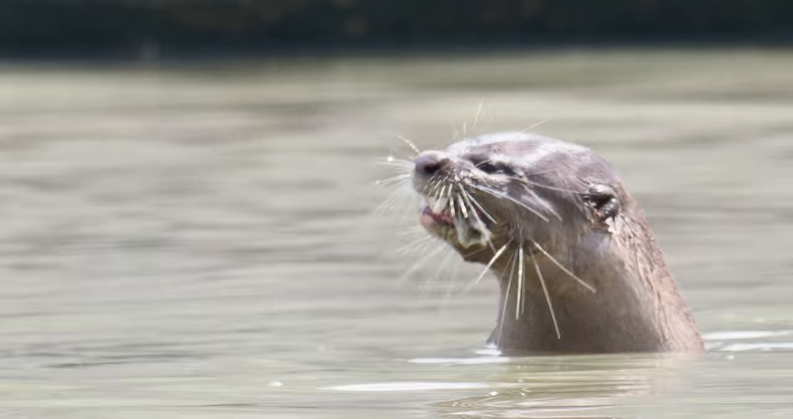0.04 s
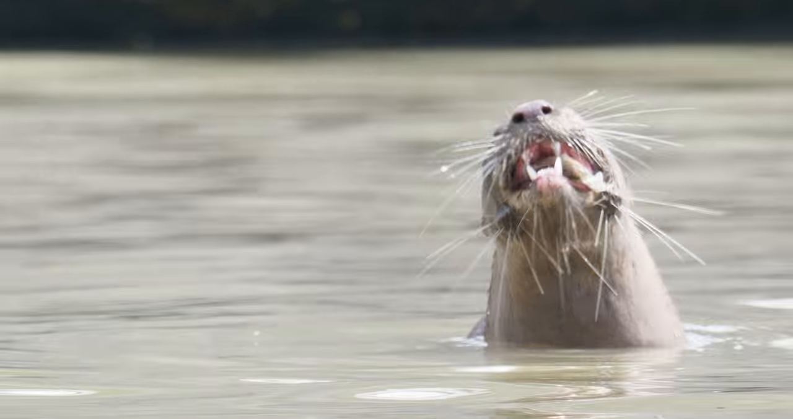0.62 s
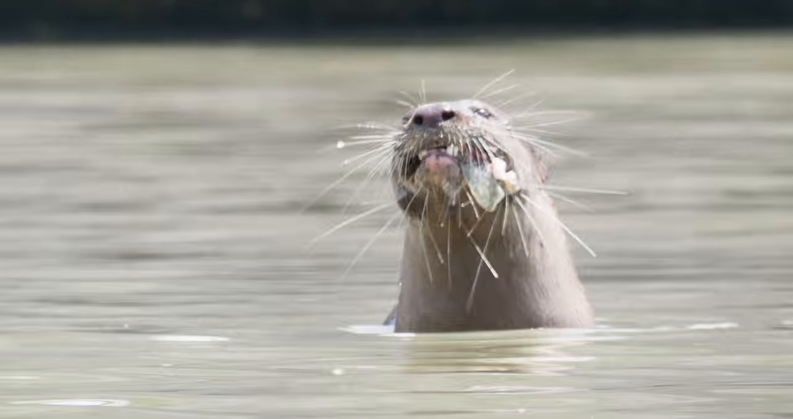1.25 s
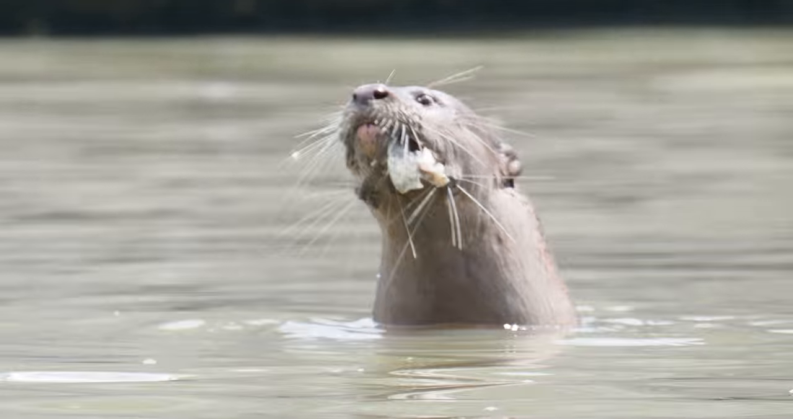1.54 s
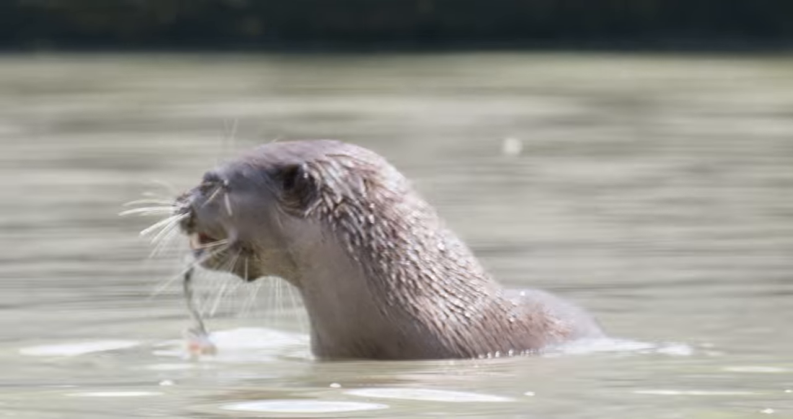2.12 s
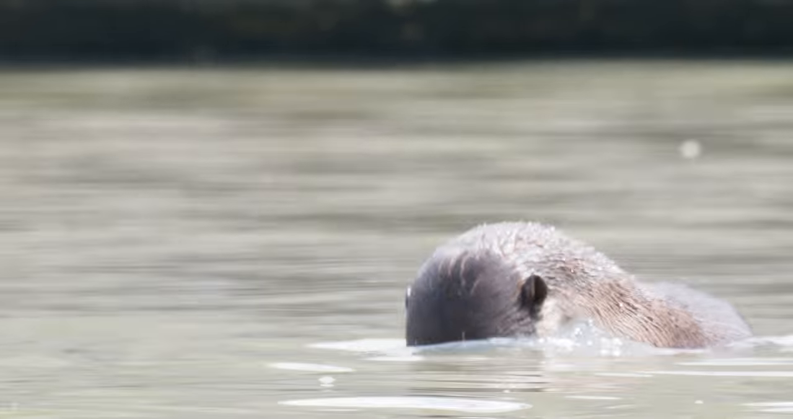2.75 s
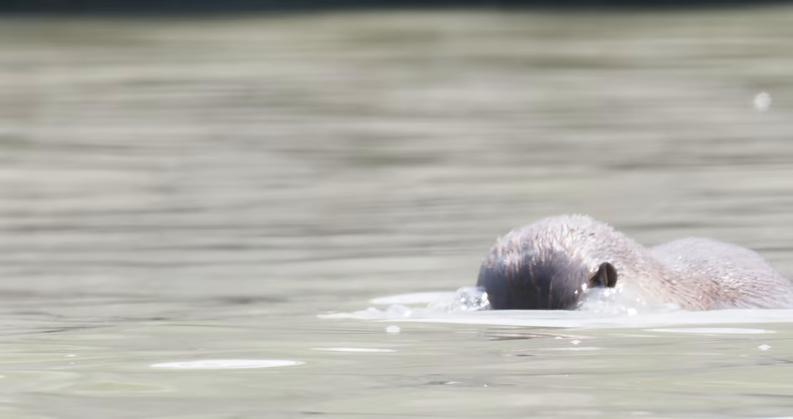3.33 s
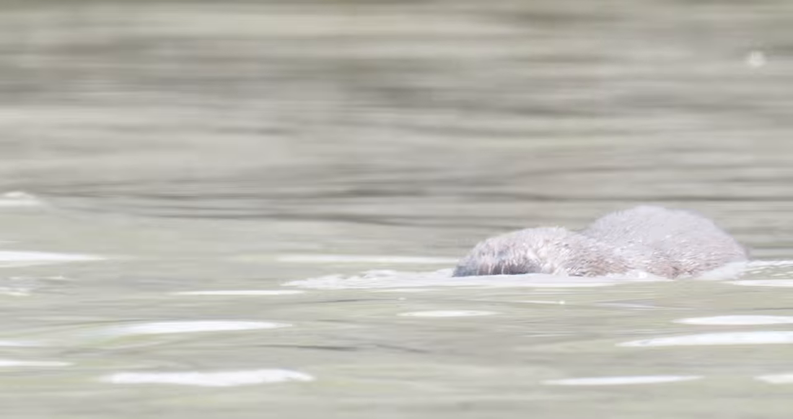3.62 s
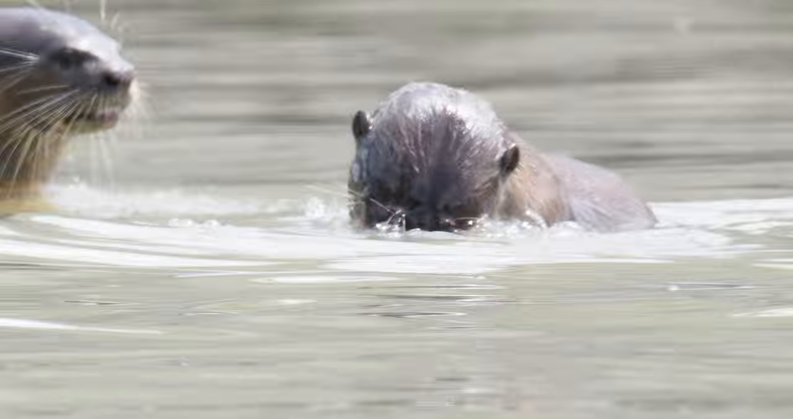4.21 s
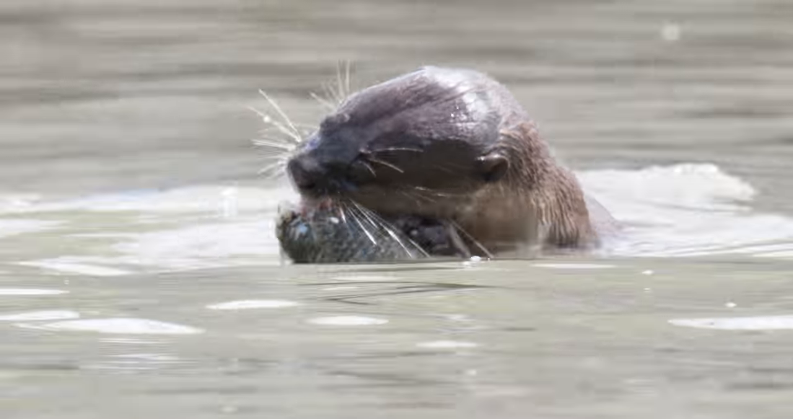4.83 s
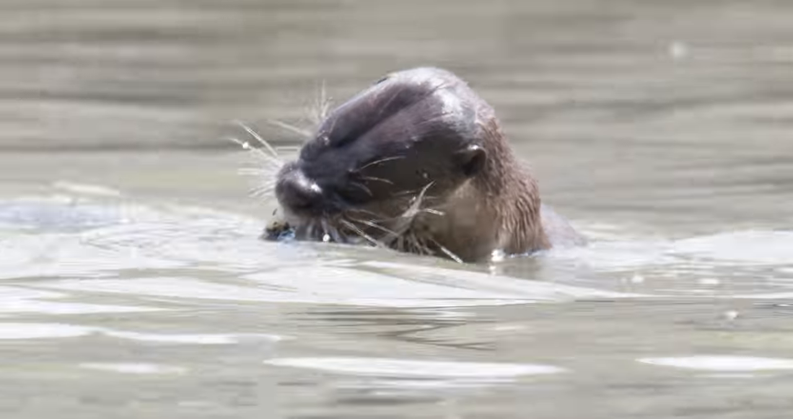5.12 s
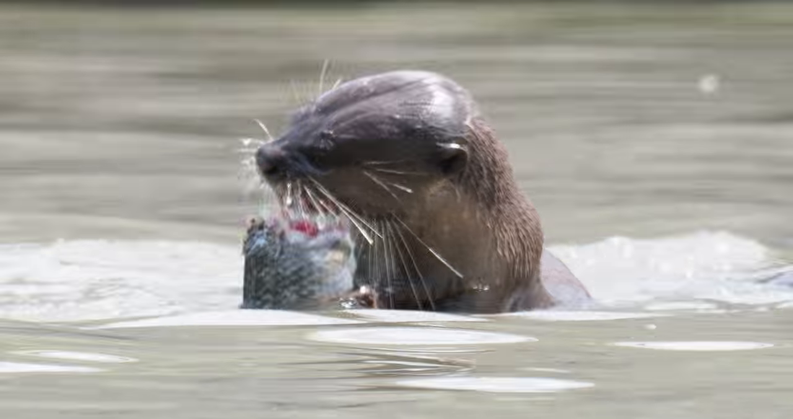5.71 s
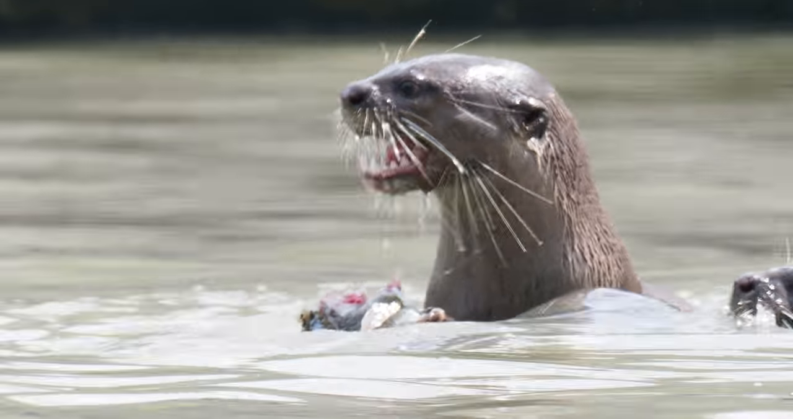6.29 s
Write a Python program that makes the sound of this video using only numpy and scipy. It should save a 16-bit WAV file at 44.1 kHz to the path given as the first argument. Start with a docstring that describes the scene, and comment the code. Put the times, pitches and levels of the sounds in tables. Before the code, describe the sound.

Two clusters of shrill otter squeaks by a river, with a low rumble and hiss of far traffic and breeze between them.

```python
"""Otters squeak in two bouts, their tight vocal folds giving nearly pure tones that the river's
ripples scatter and its bank reflects. One chews a fish in gritty snaps, and wavelets fizz faintly.
Far traffic roars and hisses as broadband noise, and one distant engine hums and sags in pitch.
The turbulence of a breeze buffets the microphone, mostly its left side."""
import sys
import numpy as np
from scipy import signal
from scipy.fft import rfft, irfft
from scipy.io import wavfile

SR = 44100
rng = np.random.default_rng(int(sys.argv[2]) if len(sys.argv) > 2 else 0)


def persist_wave(psi):
    """Save psi, clipped to +-1, as 16-bit WAV."""
    counts = np.round(np.clip(psi, -1, 1) * 32767).astype(np.int16)
    wavfile.write(sys.argv[1], SR, np.atleast_2d(counts).T)


N = 288855
T = np.arange(N) / SR
HZ = np.fft.rfftfreq(N, 1 / SR)

# Spectrum of crunches and wavelets. Each row: frequency in Hz, relative density in dB.
FIZZ_SPECTRUM = [(1500, -20), (3500, 6), (7000, 10.5), (11000, -2), (15500, 6)]


def gain_of(db):
    """Amplitude grows tenfold with every 20 dB."""
    return 10 ** (np.asarray(db) / 20)


def sides(db):
    """A level difference, left minus right, places a sound between the ears."""
    return gain_of(np.vstack([db, -db]) / 2)


def over_frequency(points):
    """Interpolation on a logarithmic frequency axis."""
    hz, value = np.transpose(points)
    return np.interp(np.log(HZ + 1), np.log(hz + 1), value)


def over_time(rows):
    """Linear interpolation in time, one curve for each column after the first."""
    times, *columns = np.transpose(rows)
    return [np.interp(T, times, column) for column in columns]


def step(at_s, over_s):
    """A smooth transition from 0 to 1."""
    return (1 + np.tanh((T - at_s) / over_s)) / 2


def bump(at_s, half_s):
    """A Gaussian swell from 0 to 1 and back."""
    return np.exp(-((T - at_s) / half_s) ** 2)


def wander(rate_hz):
    """Low-passed noise: a random fluctuation of rms 1, up to about the given rate."""
    drift = irfft(rfft(rng.standard_normal(N)) * np.exp(-(HZ / rate_hz) ** 2), N)
    return drift / np.sqrt(np.mean(drift ** 2) + 1e-20)


def noise(colour_db, correlation, balance_db=0., lag_s=.00007):
    """Partly coherent stereo noise whose channel average has rms 1; the right side lags slightly."""
    left, unrelated = rfft(rng.standard_normal((2, N)))
    shared = np.clip(correlation, -1, 1)
    right = (shared * left + np.sqrt(1 - shared ** 2) * unrelated) * np.exp(-2j * np.pi * HZ * lag_s)
    pair = irfft(np.array([left, right]) * gain_of(colour_db) * sides(balance_db), N)
    return pair / np.std(pair.mean(0))


def delayed(x, seconds):
    """Travel time shifts the phase in proportion to frequency."""
    return irfft(rfft(x) * np.exp(-2j * np.pi * HZ * seconds), N)


def scatter(x, t60, density=0.1):
    """Diffuse reflection: sparse echoes of random sign decay exponentially, different at each ear."""
    t = np.arange(SR // 2) / SR
    taps = rng.standard_normal((2, len(t))) * (rng.random((2, len(t))) < density) * 1000 ** (-t / t60)
    taps /= np.linalg.norm(taps, axis=1, keepdims=True)
    return signal.fftconvolve(x[None], taps, axes=1)[:, :N]


def traffic(roar_db=-41, hiss_db=-52, drone_db=-36.5, whine_hz=997, whine_width_hz=28, whine_db=5):
    """Far tyres sum incoherently to a roar with a faint tread whine and a hiss, over the town's drone."""
    # Three spectra. Each row: frequency in Hz, relative density in dB.
    roar_spectrum = [(200, -22), (340, -12.5), (389, -8.5), (519, -10.5), (597, -7), (719, -5.5), (853, -7),
                     (1000, -2), (1060, 0), (1240, -3.5), (1510, -6.5), (1840, -16.5), (2000, -20.5),
                     (2600, -54), (4400, -120)]
    hiss_spectrum = [(1120, -13.5), (1900, -13), (2090, -2.5), (2580, 2), (2820, -1), (3250, -2),
                     (4080, -12), (5310, -14), (6440, -22.5), (7880, -22.5), (9900, -17.5), (11400, -30),
                     (15500, -37)]
    drone_spectrum = [(20, -9), (45, -2), (70, 1.5), (110, -3.5), (170, -6.5), (250, -10), (330, -12.5),
                      (450, -41.5), (900, -81)]
    # The traffic eases slowly. Each row: time in seconds, relative levels of roar and hiss in dB.
    trend = [(0.2, -41.5, -50.5), (1.0, -41, -48.5), (1.42, -41, -49), (1.7, -40.5, -49),
             (4.0, -42.5, -51.5), (6.55, -42.5, -51.5)]
    # Likeness of the two sides. Each row: frequency in Hz, correlation (capped at 1 in use).
    likeness = [(60, 1.5), (290, 0.87), (640, 0.85), (1100, 0.7), (1500, .5), (2200, -0.6), (3100, 0),
                (7000, 0)]
    # Lean to the left. Each row: frequency in Hz, left minus right in dB.
    balance = [(100, 0.52), (400, 1.8), (1290, 2.1), (2400, 4.6), (4400, 3.6), (8100, 1.7), (15000, 6)]
    roar_trend_db, hiss_trend_db = (db - np.median(db) for db in over_time(trend))
    stereo = over_frequency(likeness), over_frequency(balance)
    whine = whine_db * np.exp(-((HZ - whine_hz) / whine_width_hz) ** 2)
    roar = noise(over_frequency(roar_spectrum) + whine, *stereo) * gain_of(roar_db + roar_trend_db)
    hiss = noise(over_frequency(hiss_spectrum), *stereo) * gain_of(hiss_db + hiss_trend_db)
    drone = noise(over_frequency(drone_spectrum), *stereo) * gain_of(drone_db + roar_trend_db)
    flicker = gain_of(0.5 * wander(41))
    return (roar + hiss) * flicker + drone


def engine(fast_hz=150.4, slow_hz=141.53, waver=0.0057, fading_db=2.5):
    """Pitch follows speed: a slowing engine's hum and octave sag, and fade in and out over the water."""
    # Strength of the hum. Each row: time in seconds, base levels of fundamental and octave in dB.
    levels = [(0.2, -43, -43), (0.68, -60, -49), (1.2, -40, -40.5), (1.5, -42.5, -43), (1.9, -34.5, -40),
              (2.15, -46.5, -47.5), (2.4, -43.5, -45), (4.1, -49, -48), (4.8, -44, -49), (5.5, -61, -54),
              (6.55, -51, -47.5)]
    # At moments the air carries the octave better. Each row: time in seconds, lift in dB.
    lifts = [(3.7, 8), (4.43, 9.5), (5.17, 10.5)]
    hz = fast_hz + (slow_hz - fast_hz) * step(at_s=1.5, over_s=1.055)
    fundamental_db, octave_db = over_time(levels)
    octave_db += sum(lift_db * bump(at_s, half_s=0.13) for at_s, lift_db in lifts)
    phase = 2 * np.pi * np.cumsum(hz * (1 + waver * wander(22.6))) / SR
    fundamental = gain_of(fundamental_db + fading_db * wander(15)) * np.sin(phase)
    octave = gain_of(octave_db + fading_db * wander(15)) * np.sin(2 * phase)
    return sides(2.1) * np.sqrt(2) * (fundamental + octave)


def wind(breeze_db=-35.5, easing_db_per_s=0.5, lumpy_db=0.7):
    """Turbulent pressure is local, so the microphone's two ports are buffeted almost independently."""
    # Spectrum of the turbulence. Each row: frequency in Hz, relative density in dB.
    spectrum = [(8, -22), (20, -3), (38, 4.5), (70, -2), (110, -12), (180, -17.5), (300, -29), (600, -58),
                (1500, -88)]
    # Gusts add to the breeze in power. Each row: time in seconds, peak in dB, half length in seconds.
    gusts = [(0.224, -31, 0.14), (.55, -31, 0.12), (1.23, -27.5, 0.052), (1.698, -28.5, 0.028),
             (2.266, -29.5, 0.13), (2.6, -29, .04), (2.845, -32, 0.048), (3.29, -32, 0.116),
             (3.88, -26, 0.067), (4.655, -33.5, 0.05), (5.063, -31, 0.13), (5.54, -28.5, .09),
             (6.31, -29.5, .05)]
    # Eddies thump the left port. Each row: time in seconds, peak in dB, half length in seconds.
    eddies = [(0.448, -15, 0.0035), (0.569, -13.5, 0.002), (0.629, -16, 0.0032), (1.242, -15.5, 0.0029),
              (1.672, -9.5, 0.0021), (1.692, -15, 0.0011), (1.998, -16, 0.0035), (2.602, -15, 0.0024),
              (3.353, -16.5, 0.0021)]
    gust_power = sum(gain_of(peak_db) ** 2 * bump(at_s, half_s) for at_s, peak_db, half_s in gusts)
    strength = np.sqrt(gain_of(breeze_db - easing_db_per_s * T) ** 2 + gust_power)
    air = noise(over_frequency(spectrum), correlation=0.25, balance_db=10)
    air *= strength * gain_of(lumpy_db * wander(13))
    for at_s, peak_db, half_s in eddies:
        passage = (T - at_s) / half_s
        suck_then_push = passage * np.exp((1 - passage ** 2) / 2)
        air += np.vstack([1, .1]) * gain_of(peak_db) * suck_then_push
    return air


def lapping(calm_db=-74.5, swim_db=6.5, surge_db=2, grain_db=4):
    """Wavelets fizz as amplitude-modulated noise, livelier while an otter turns and swims."""
    level_db = calm_db + swim_db * bump(at_s=2.4, half_s=1.3)
    level_db += surge_db * wander(7.2) + grain_db * wander(400)
    return gain_of(level_db) * noise(over_frequency(FIZZ_SPECTRUM), correlation=0.13)


def crunches(snap_s=0.006, patter_s=0.036, patter_db=-13, grain_db=4):
    """Noise bursts with two exponential decays: a quick gritty snap and a softer patter of drops."""
    # Teeth crunch and water flicks. Each row: start in seconds, base level of the snap in dB.
    bites = [(0.5701, -57), (.615, -50), (1.5797, -54), (2.8295, -56.5), (2.8514, -59), (3.1842, -59),
             (3.455, -61), (3.4999, -57), (3.5553, -65.5), (3.6386, -58.5), (3.6644, -60), (4.359, -63),
             (4.5655, -60), (4.8509, -64)]
    envelope = np.zeros(N)
    for start, level_db in bites:
        age = abs(T - start)
        decay = np.exp(-age / snap_s) + gain_of(patter_db) * np.exp(-age / patter_s)
        envelope += (T >= start) * gain_of(level_db) * decay
    grit = gain_of(grain_db * wander(500))
    return envelope * grit * noise(over_frequency(FIZZ_SPECTRUM), correlation=0.22)


def contour(start, top, slip, end, start_hz, top_hz, end_hz, slip_share, fall_bow,
            loudest, peak_db, swell_db, fade_db, rise_bow=3.4, wobble_hz=70, waver_db=2.2):
    """Frequency and amplitude modulation of a squeak: a quick glide, then a fall with a sudden slip."""
    # The voice cracks upward. Each row: start and length in seconds, jump in Hz, lift in dB.
    cracks = [(.752, .02, 440, 8), (5.882, .011, 450, 3), (5.904, .008, 520, 0), (6.296, .038, 530, 6),
              (6.361, .022, 300, 2)]
    rise_left = np.interp(T, [start, top], [1, 0]) ** rise_bow
    glide = np.interp(T, [top, end], [0, 1]) ** fall_bow
    fall = (1 - slip_share) * glide + slip_share * step(slip, over_s=.005)
    hz = top_hz + (start_hz - top_hz) * rise_left + (end_hz - top_hz) * fall
    hz += wobble_hz * np.sqrt(abs(fall)) * wander(40)  # less steady as it falls
    level_db = peak_db + 0.1 + np.interp(T, [start, loudest, end], [-swell_db, 0, fade_db])
    level_db += waver_db * wander(51)
    for at_s, length, jump_hz, lift_db in cracks:
        if start < at_s < end:
            cracked = step(at_s, over_s=0.0019) - step(at_s + length, over_s=0.0019)
            hz += jump_hz * cracked
            level_db += lift_db * cracked
    return start, end, hz, level_db


def squeak(start, end, hz, level_db, overtone_db, rough,
           jitter=0.0405, flutter_hz=330, edge_s=0.0032, mouth_hz=6000):
    """Tight vocal folds vibrate almost sinusoidally; jitter and shimmer roughen the tone."""
    gate = np.clip(np.minimum(T - start, end - T) / edge_s + 1 / 2, 0, 1)
    phase = 2 * np.pi * np.cumsum(hz * (1 + jitter * rough * wander(flutter_hz))) / SR
    # The overtones swell late in the call and fade at high pitch.
    progress = (T - start) / (end - start)
    pressed_db = 9 * np.interp(progress, [0, .3, .55, .8, 1], [-0.3, -0.35, -0.47, -0.026, -0.29])
    mellow_db = -5 * ((hz / mouth_hz) ** 4 - 2)
    overtone_gain = gain_of(overtone_db + pressed_db + mellow_db + 3.3 * wander(90))
    third = gain_of(-23) * (hz < SR / 6) * np.sin(3 * phase)  # muted where it would alias
    voice = np.sin(phase) + overtone_gain * (np.sin(2 * phase) + third)
    shimmer = 1 + rough * wander(flutter_hz)
    return np.sqrt(2) * gate * gain_of(level_db) * shimmer * voice


def otters(bank_delay_s=.049, tail_db=-26):
    """Multipath propagation: squeaks arrive directly, glance off ripples and echo from the bank."""
    # The calls. Each row: start, top, slip and end in seconds; start, top and end pitch in Hz;
    # the slip's share of the fall; bow of the fall (1 is straight); loudest moment in seconds;
    # base level, swell from the start, fade by the end, base overtone level and left minus right,
    # all in dB; roughness from 0 to 1; bank echo in dB.
    calls = [(.1, .111, .179, .252, 5200, 5900, 3540, .1, 1.94, .178, -32.5, 2, -22, -21, -1, .11, -27),
             (.527, .579, .63, .674, 4910, 6020, 3610, .16, 1.9, .545, -37.5, 19, -13, -25, 2.7, .045, -32),
             (.595, .645, .696, .736, 5020, 6030, 3700, .15, 1.85, .675, -29.5, 15, -16, -22.5, 0, .03, -37),
             (.715, .757, .847, .96, 5880, 6350, 3750, .06, 1.66, .845, -39.5, 11, -13, -20.5, 1.6, .07, -26),
             (5.301, 5.358, 5.378, 5.397, 3940, 7530, 6990, .19, 1.5, 5.325, -42, 10, -7, -33, 0, .13, -28),
             (5.356, 5.391, 5.439, 5.485, 4800, 7200, 5480, .13, 1.97, 5.381, -39.5, 22, -5, -28, -1, .17, -24),
             (5.85, 5.903, 5.953, 5.989, 7150, 7750, 5450, .29, 1.55, 5.955, -39.5, 16, -4, -27, .9, .13, -16.5),
             (6.288, 6.385, 6.443, 6.511, 7800, 7610, 5620, .26, 1.34, 6.398, -40, 12, -3.5, -19, -1.1, .09, -22)]
    direct, echo = np.zeros((2, N)), np.zeros(N)
    for *shape, overtone_db, pan_db, rough, echo_db in calls:
        voice = squeak(*contour(*shape), overtone_db, rough)
        direct += sides(pan_db) * voice
        echo += gain_of(echo_db) * voice
    echo = delayed(echo, bank_delay_s)
    middle = direct.mean(0)
    # Ripples scatter the highest pitches most and spread them between the ears.
    ripple_gain = gain_of(over_frequency([(5800, -0.5), (7300, 6.5), (12000, 7)]))
    glancing = irfft(rfft(middle) * ripple_gain, N)
    spread = np.outer([1, -1], scatter(glancing, t60=0.0051)[0])
    near = gain_of(-1.5) * direct + gain_of(-8) * spread
    bank = echo + gain_of(-1) * scatter(echo, t60=0.98)
    return near + bank + gain_of(tail_db) * scatter(middle, t60=0.65)


def scene():
    """Superposition: the pressures of all sources add."""
    return otters() + crunches() + lapping() + traffic() + engine() + wind()


def record(dry, start_s=.156, cutoff_hz=15850):
    """Gating and band limiting: the sound switches on after a brief silence and is low-passed."""
    lowpass = signal.firwin(511, cutoff_hz, window=("kaiser", 9), fs=SR)
    return signal.oaconvolve(dry * (T >= start_s), lowpass[None], "same")


dry = scene()
out = record(dry)
persist_wave(out)
```